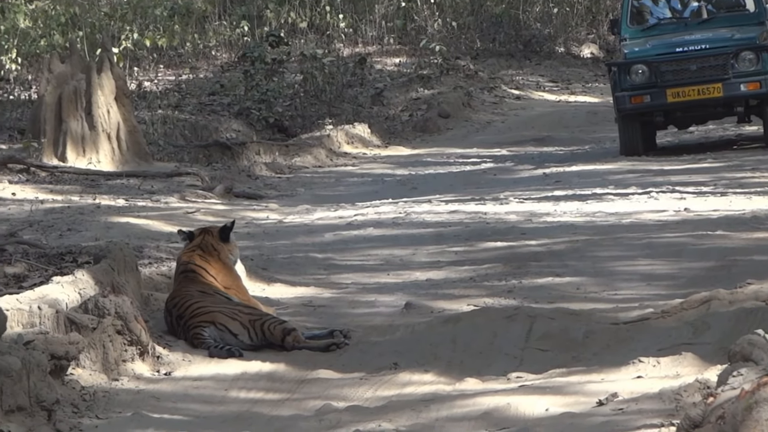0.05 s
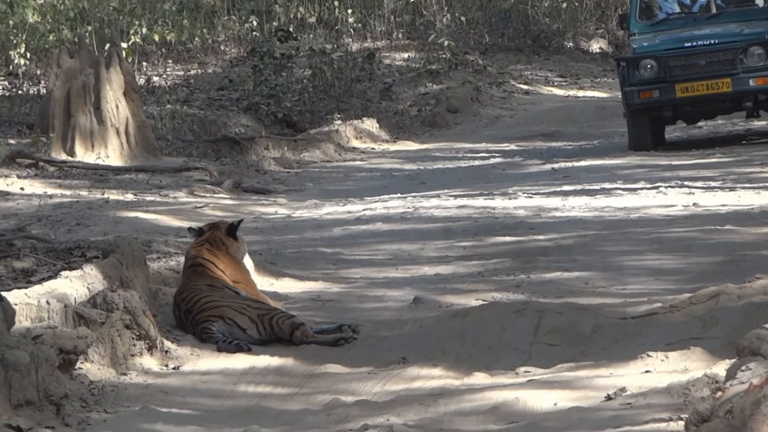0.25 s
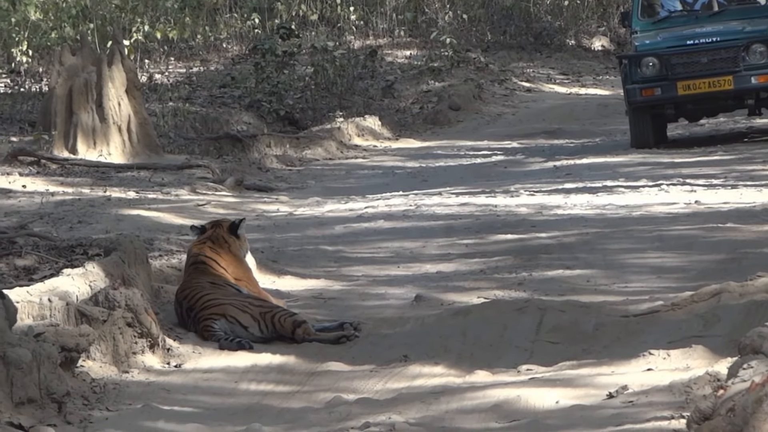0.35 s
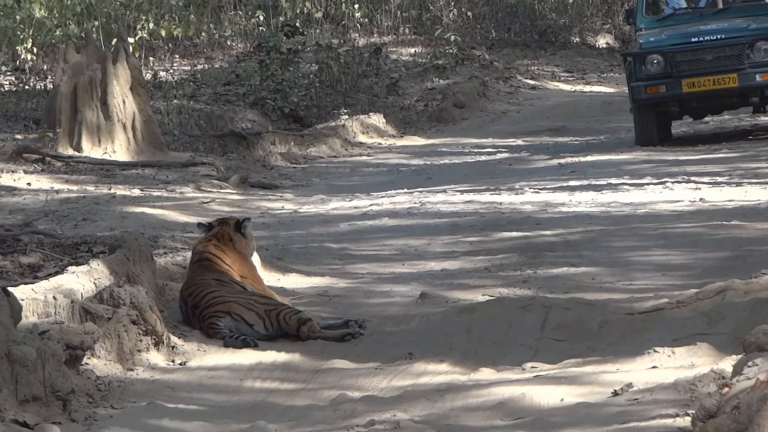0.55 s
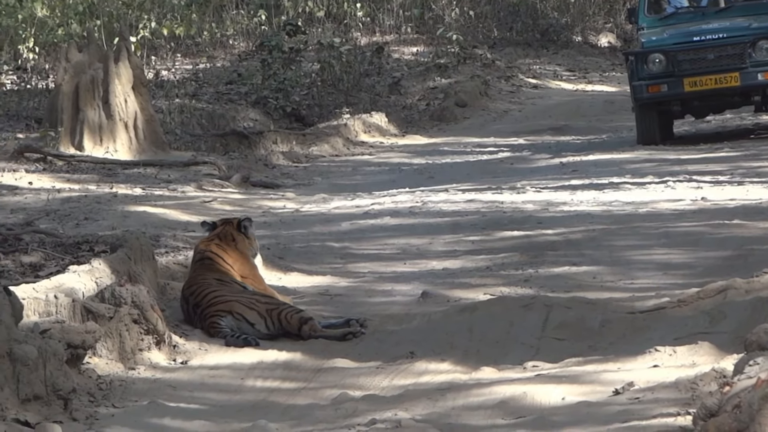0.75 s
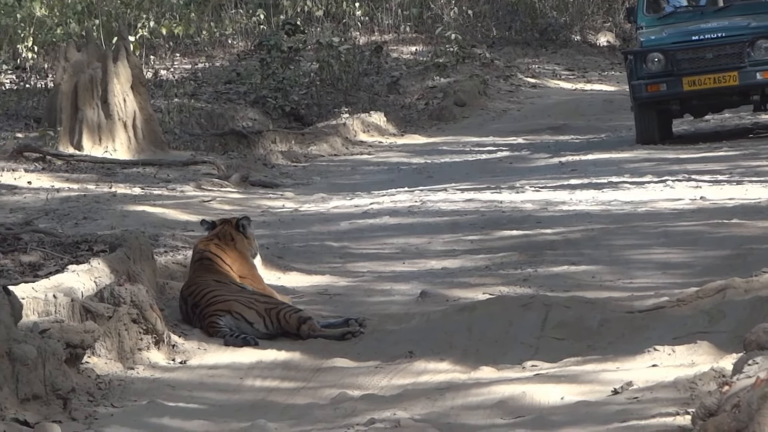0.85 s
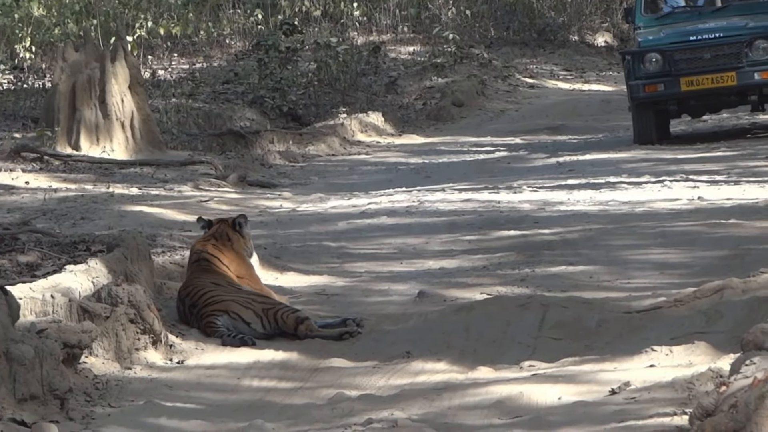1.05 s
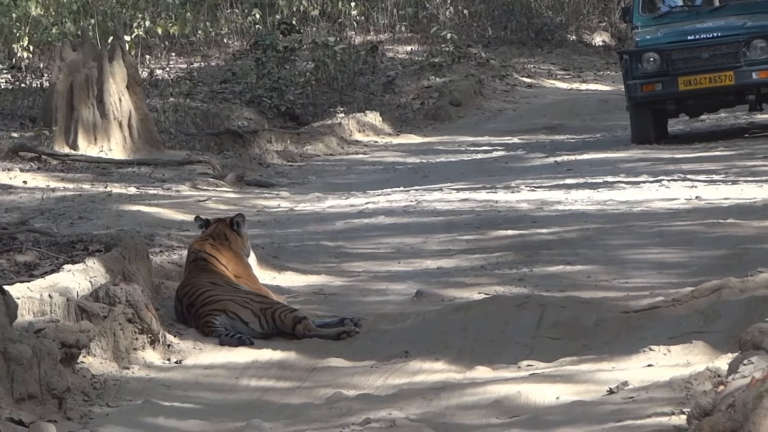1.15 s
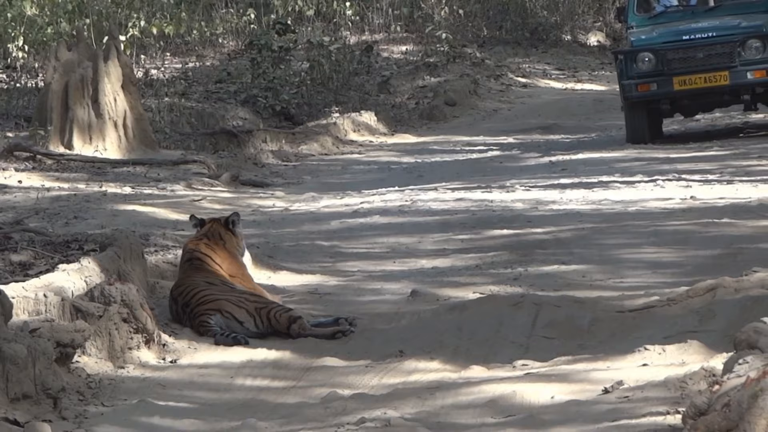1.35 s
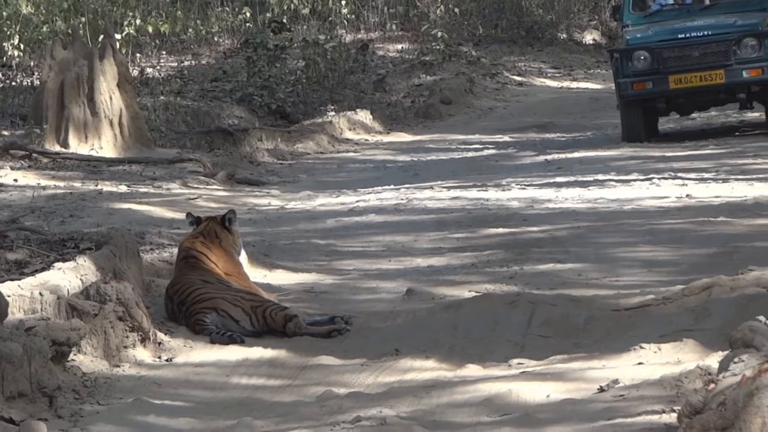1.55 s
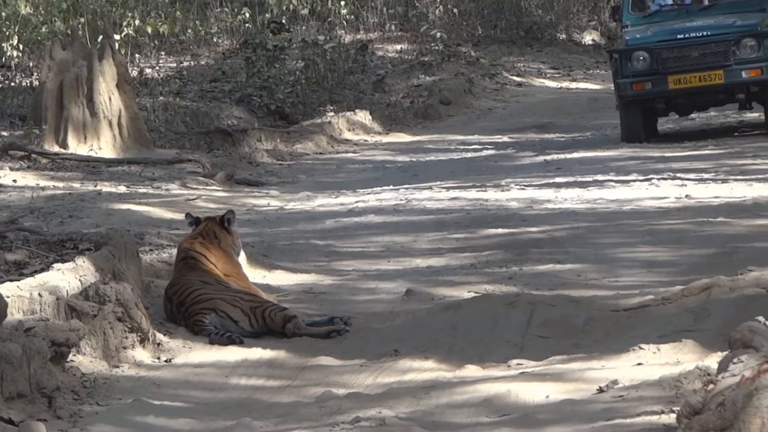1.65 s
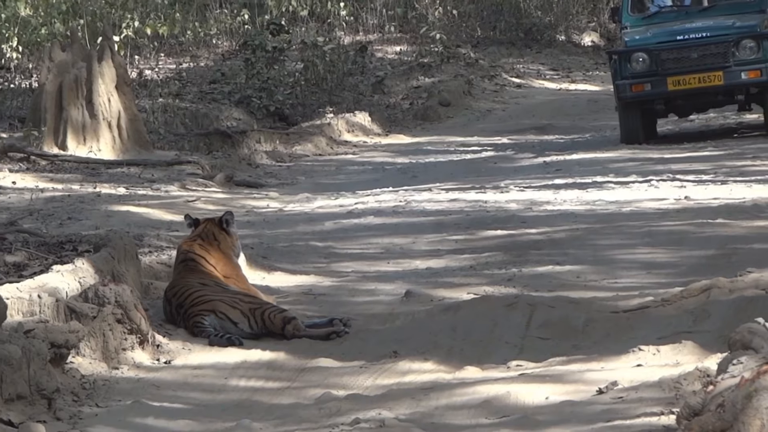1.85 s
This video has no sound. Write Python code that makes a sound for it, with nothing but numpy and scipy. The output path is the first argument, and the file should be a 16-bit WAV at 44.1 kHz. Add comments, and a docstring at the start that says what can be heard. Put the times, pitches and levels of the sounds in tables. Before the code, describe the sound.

One sinking tiger moan turns into a fluttering growl over faint forest hiss.

```python
"""A tiger gives one long moan, some way off in a forest. The call starts as a clear, sinking tone, the vocal
folds sounding through the open mouth, with a breathy rasp and a thin hiss at the teeth. As the jaws close the
folds pulse unevenly, and it breaks into a rough, fluttering growl that darkens and dies away over a rumble an
octave below. The trees scatter a soft tail, and a faint, steady rumble and hiss fill the forest."""
import sys
import numpy as np
from scipy import signal
from scipy.fft import rfft, irfft
from scipy.io import wavfile
from scipy.ndimage import uniform_filter1d

SR = 44100
rng = np.random.default_rng(int(sys.argv[2]) if len(sys.argv) > 2 else 0)


def pcm_store(signal):
    """Save signal as 16-bit PCM."""
    levels = np.round(np.clip(np.atleast_2d(signal), -1, 1) * 32767)
    wavfile.write(sys.argv[1], SR, levels.astype(np.int16).T)


N = 83790
TIME = np.arange(N) / SR
BIN_HZ = np.arange(N // 2 + 1) * SR / N


def from_db(db):
    """Decibels to gain."""
    return 10 ** (np.asarray(db) / 20)


def unit_power(x):
    """Scale to an RMS of one."""
    return x / np.sqrt(np.mean(x ** 2) + 1e-20)


def curve(rows, column=1):
    """One column of an automation curve at every sample."""
    rows = np.array(rows)
    return np.interp(TIME, rows[:, 0], rows[:, column])


def fader(rows, column=1):
    """Gain of a dB curve, fading 100 dB a second after its last point."""
    return from_db(curve(rows, column) - 100 * np.maximum(TIME - rows[-1][0], 0))


def spectrum(rows):
    """A curve over log frequency, read at every FFT bin."""
    rows = np.array(rows)
    return np.interp(np.log(BIN_HZ + 1), np.log(rows[:, 0]), rows[:, 1])


def drift(rate_hz):
    """Random wobble with a spread of one, mostly slower than rate_hz."""
    return unit_power(irfft(rfft(rng.standard_normal(N)) / (1 + (BIN_HZ / rate_hz) ** 2), N))


def butter(x, hz, kind, order=2):
    """Butterworth filter."""
    return signal.sosfilt(signal.butter(order, hz, kind, fs=SR, output="sos"), x)


def resonate(x, hz, q):
    """A still or moving resonance, applied twice for steep skirts."""
    hz = np.broadcast_to(hz, N)
    out, state, block = np.zeros(N), np.zeros((2, 2)), 64
    for i in range(0, N, block):
        w = 2 * np.pi * hz[i] / SR
        r = np.exp(-w / (2 * q))
        section = [(1 - r * r) / 2, 0, (r * r - 1) / 2, 1, -2 * r * np.cos(w), r * r]
        out[i:i + block], state = signal.sosfilt([section, section], x[i:i + block], zi=state)
    return out


def hold_level(x, window_s=.03):
    """Hold the power steady, leaving the fast flutter."""
    size = int(window_s * SR)
    power = uniform_filter1d(uniform_filter1d(x * x, size), size)
    return x / np.sqrt(np.abs(power) + 1e-12)


# The sinking note of the moan. Each row: time in seconds, pitch in Hz.
PITCH = [(0, 210.1), (.085, 191.6), (.16, 187.1), (.21, 179.9), (.275, 164.8), (.335, 168.3), (.44, 168.2),
         (.65, 150), (.95, 151.8)]


def fold_pitch():
    """The vocal folds slide down in pitch with a slight jitter."""
    return curve(PITCH) * (1 + .005 * drift(44))


# The lowest throat resonance, falling as the jaws close. Each row: time in seconds, centre in Hz.
MOUTH = [(.05, 720), (.18, 670), (.24, 570), (.29, 445), (.335, 352), (.38, 315), (.43, 305), (.465, 222),
         (.57, 198), (.68, 160), (.95, 158)]
# Upper resonances of the open mouth. Each row: centre in Hz, width in Hz, gain in dB.
OPEN_FORMANTS = [(730, 73, -13), (1137, 56, -7.5), (1330, 140, -32), (2030, 210, -25.5)]
MOUTH_Q, OPEN_MOUTH_HZ, JAW_MUFFLING = 2.6, 640, 1.73
PHARYNX_HZ, PHARYNX_WIDTH_HZ = 340, 110


def throat_gain(hz, mouth_hz):
    """Throat and mouth shape a partial; the closing jaws muffle the upper resonances."""
    ratio = hz / mouth_hz
    lowest = 1 / np.hypot(1 - ratio ** 2, ratio / MOUTH_Q) / np.hypot(1, (ratio / 1.5) ** 3)
    pharynx_lift = 1 + .65 / (1 + (2 * (hz - PHARYNX_HZ) / PHARYNX_WIDTH_HZ) ** 2)
    upper = sum(from_db(db) / np.hypot(1, 2 * (hz - centre) / width) ** 1.07
                for centre, width, db in OPEN_FORMANTS)
    return lowest * pharynx_lift + upper * (mouth_hz / OPEN_MOUTH_HZ) ** JAW_MUFFLING


# The swell of the clear tone. Each row: time in seconds, level of the fundamental in dB.
TONE_SWELL = [(0, -68), (.04, -61), (.11, -53), (.21, -48), (.29, -38.3), (.33, -34), (.38, -31.5),
              (.435, -30), (.48, -44), (.56, -70)]
# The folds brighten with effort, then slacken. Each row: time in seconds, tilt in dB per octave.
BRIGHTNESS = [(.05, -9.5), (.11, -3.5), (.21, -.3), (.26, -1), (.33, .7), (.44, -2)]
# The voice cracks as every second cycle weakens.
# Each row: time in seconds, gain in dB of the partials halfway between the harmonics.
DOUBLING = [(.28, -52.5), (.315, -10.5), (.345, -0.5), (.37, -21.5), (.45, -20)]


def clear_tone(pitch, cycles):
    """Harmonics of the folds sound through the closing mouth; for a moment the period doubles."""
    mouth_hz, tilt_db, doubling = curve(MOUTH), curve(BRIGHTNESS), from_db(curve(DOUBLING))
    tone = 0
    for k in np.arange(1, 13, .5):
        hz = k * pitch
        shimmer_db = .55 * np.sqrt(k) * drift(38)
        gain = throat_gain(hz, mouth_hz) * from_db(tilt_db * np.log2(k) + shimmer_db)
        if k % 1:  # halfway partials fall away below the mouth resonance
            below_hz = np.maximum(mouth_hz - hz, 0)
            gain = gain * doubling / (1 + (below_hz / 53) ** 2)
        lag = np.arctan2(hz / mouth_hz / MOUTH_Q, 1 - (hz / mouth_hz) ** 2)
        tone = tone + gain * np.cos(2 * np.pi * k * cycles - lag)
    return np.sqrt(2) * fader(TONE_SWELL) * tone / throat_gain(pitch, mouth_hz)


# The forest's reverb. Each row: band centre in Hz, seconds to fall by 60 dB,
# level against the direct sound in dB, side against mid in dB.
TREE_REVERB = [(170, 1.0, -12, -7), (420, .7, -12, -1), (1100, .7, -6, 0), (3000, .6, -2, 0)]


def tree_reverb(call):
    """Trunks and leaves scatter a soft tail, wider in the treble."""
    t, response = np.arange(SR) / SR, 0
    for hz, t60, db, side_db in TREE_REVERB:
        low, high = hz / np.sqrt(3), hz * np.sqrt(3)
        mid, side = butter(rng.standard_normal((2, SR)), [low, high], "band") * from_db(-60 * t / t60)
        tail = mid + from_db(side_db) * side * [[1], [-1]]
        band_share = (high - low) / (SR / 2)
        response = response + from_db(db) * tail * np.sqrt(2 * band_share / np.sum(tail ** 2))
    return signal.fftconvolve(call[None], response, axes=1)[:, :N]


# The colour of the forest bed. Each row: frequency in Hz, relative level in dB.
BED_COLOUR = [(15, -38), (25, -2.5), (48, -7), (106, -4.5), (137, -4.5), (234, -5.5), (342, -5), (526, -9),
              (629, -10), (1020, -11.5), (1130, -13.5), (1490, -16.5), (10800, -29), (14000, -58.5),
              (22000, -120)]
# Its stereo image. Each row: frequency in Hz, left-right likeness from 0 (wide) to 1 (mono).
BED_LIKENESS = [(60, 0.83), (140, 0.8), (330, 0.11), (790, .05), (1860, 0.22), (4400, 0.36), (10400, 0.86)]


def forest_bed(level_db=-57):
    """A faint, steady rumble and hiss, wide in the mids and narrow at both ends."""
    mid, side = rfft(rng.standard_normal((2, N))) * from_db(spectrum(BED_COLOUR))
    alike = spectrum(BED_LIKENESS)
    stereo = np.sqrt(1 + alike) * mid + np.sqrt(1 - alike) * side * [[1], [-1]]
    return from_db(level_db) * unit_power(irfft(stereo, N))


# The flutter in rasp and growl. Each row: time in seconds, flaps per second.
FLUTTER_RATE = [(.45, 58), (.56, 56), (.68, 25), (1.0, 27.04)]


def throat_flutter(depth=.65, wander=.2):
    """The throat flaps at a wandering rate, swinging a gain around one."""
    flaps = np.cumsum(curve(FLUTTER_RATE) * (1 + wander * drift(15))) / SR
    return 1 + depth * np.cos(2 * np.pi * flaps)


# The rasp's body, in the second throat resonance. Each row: time in seconds, centre in Hz, level in dB.
RASP_BODY = [(.08, 784, -74.5), (.24, 806, -50.5), (.33, 740, -46), (.43, 671, -44), (.51, 572, -40.5),
             (.61, 530, -41.5), (.68, 479, -57), (.8, 489, -56.5), (.93, 501, -68), (1.2, 478, -78)]
# The rasp's treble edge. Each row: time in seconds, level in dB.
RASP_EDGE = [(.05, -91.5), (.18, -56.5), (.29, -47.5), (.38, -56.5), (.52, -56.5), (.65, -59.5),
             (.8, -61.5), (.92, -70.5), (1.2, -79)]
# The colour of that edge. Each row: centre in Hz, width in Hz, relative level at mid-call in dB,
# change as the jaws close in dB per second.
EDGE_FORMANTS = [(886, 63, -1, -12.5), (1071, 97, 0, -16), (1466, 190, -1.5, 7.5), (2090, 440, -11, 6),
                 (3145, 150, -14, 4.5)]
MID_CALL_S = .54


def rasp(cycles, flutter):
    """Turbulent breath, pulsing with each cycle of the folds, excites the upper throat resonances."""
    fold_gate = 1 + .35 * np.cos(2 * np.pi * cycles)
    puffs = rng.standard_normal(N) * (1 + .3 * (flutter - 1)) * fold_gate
    body = hold_level(resonate(puffs, curve(RASP_BODY), q=4.4))
    closing_s = np.minimum(TIME - MID_CALL_S, MID_CALL_S)
    edge = 0
    for k, (hz, width, db, db_per_s) in enumerate(EDGE_FORMANTS):
        ring = unit_power(signal.lfilter(*signal.iirpeak(hz, hz / width, fs=SR), puffs))
        edge = edge + (-1) ** k * from_db(db + db_per_s * closing_s) * ring
    edge = butter(butter(edge, 870, "high"), 3500, "low", order=1)
    return fader(RASP_BODY, column=2) * body + fader(RASP_EDGE) * hold_level(edge)


# A thin hiss on top of the call. Each row: time in seconds, level in dB.
TEETH_HISS = [(.15, -77.5), (.42, -73), (.55, -79.5), (.75, -105)]


def teeth_hiss():
    """Air rushes past the teeth at the height of the call."""
    return fader(TEETH_HISS) * unit_power(resonate(rng.standard_normal(N), hz=6000, q=1.8))


def rough_pulses(pitch, flutter, jitter=.2, shimmer_db=2):
    """The folds beat unevenly in time and strength, and the flutter bunches their pulses."""
    cycles = np.cumsum(pitch * np.exp(jitter * (drift(70) - jitter / 2))) / SR
    return np.diff(np.floor(cycles), prepend=0) * flutter * from_db(shimmer_db * drift(140))


# The growl takes over from the tone. Each row: time in seconds, level in dB.
GROWL_SWELL = [(.2, -72), (.33, -44), (.42, -30.5), (.47, -26), (.53, -26), (.63, -29), (.68, -26),
               (.77, -28.5), (.85, -29), (.95, -34.5), (.975, -47), (1.09, -49), (1.16, -60.5)]


def growl(pulses, pitch):
    """Rough pulses ring in mouth and pharynx, keeping a narrow core at the pitch of the folds."""
    mouth = resonate(pulses, curve(MOUTH), q=2.41)
    core = from_db(-5.5) * resonate(pulses, pitch, q=3.6)
    pharynx = from_db(-17) * resonate(pulses, PHARYNX_HZ, q=7.8)
    voice = butter(mouth + core + pharynx, 111.5, "high", order=6)
    return fader(GROWL_SWELL) * hold_level(voice)


# The sub-octave under the growl. Each row: time in seconds, level in dB.
SUB_OCTAVE_SWELL = [(.25, -70.5), (.5, -55), (.63, -50), (.75, -46), (.86, -42.5), (.97, -59), (1.15, -58)]


def sub_octave(pulses, pitch):
    """The same rough pulses ring an octave below the folds, as every other cycle of the folds weakens."""
    return fader(SUB_OCTAVE_SWELL) * hold_level(resonate(pulses, pitch / 2, q=4))


def scene():
    """The tiger straight ahead, among the trees."""
    pitch, flutter = fold_pitch(), throat_flutter()
    cycles = np.cumsum(pitch) / SR
    tone = clear_tone(pitch, cycles)
    pulses = rough_pulses(pitch, flutter)
    call = tone + growl(pulses, pitch) + sub_octave(pulses, pitch) + rasp(cycles, flutter)
    call = call + teeth_hiss()
    return call + tree_reverb(call) + forest_bed()


def record(dry):
    """A steep low-pass takes off the top above 11 kHz."""
    return signal.sosfilt(signal.ellip(12, .1, 70, 11000, fs=SR, output="sos"), dry)


dry = scene()
out = record(dry)
pcm_store(out)
```